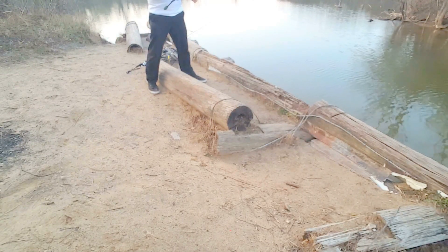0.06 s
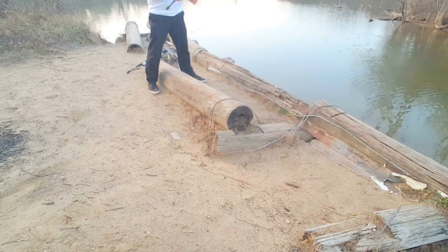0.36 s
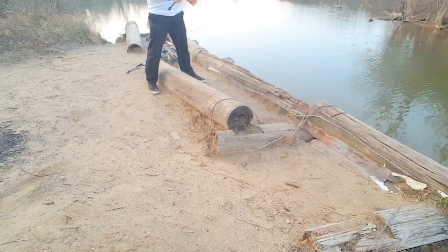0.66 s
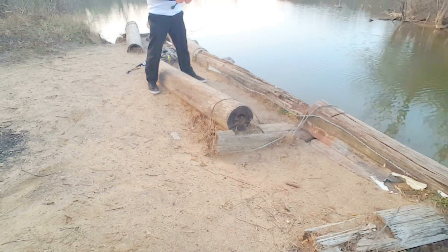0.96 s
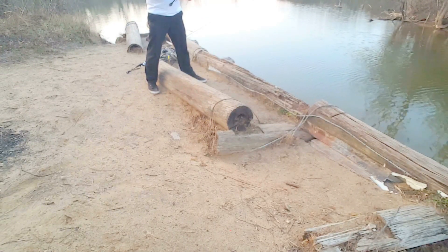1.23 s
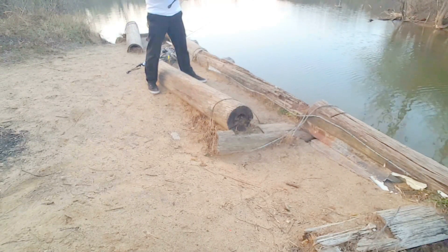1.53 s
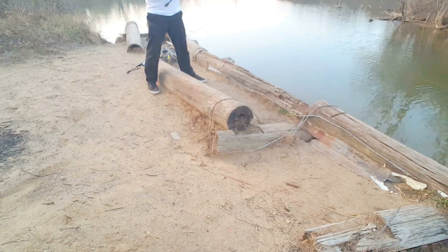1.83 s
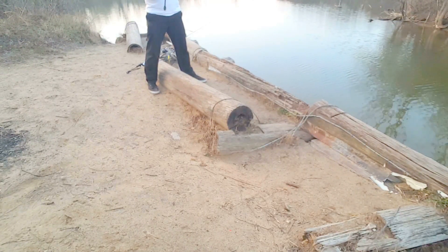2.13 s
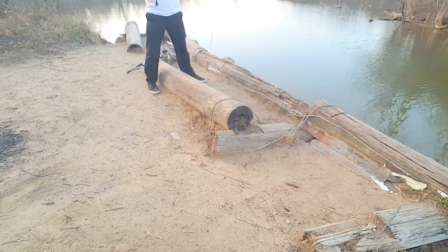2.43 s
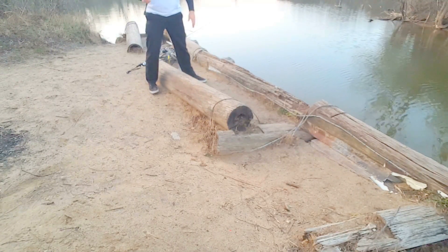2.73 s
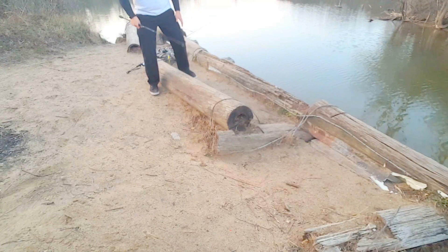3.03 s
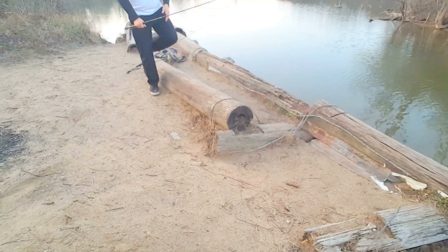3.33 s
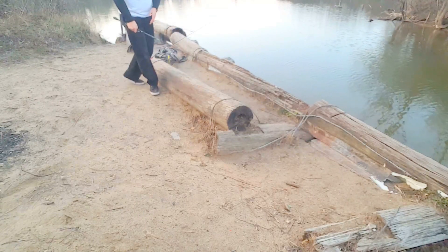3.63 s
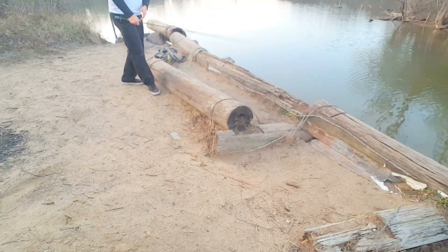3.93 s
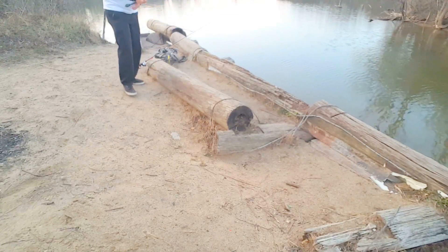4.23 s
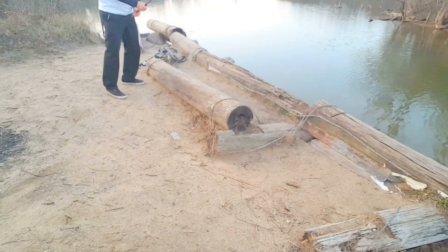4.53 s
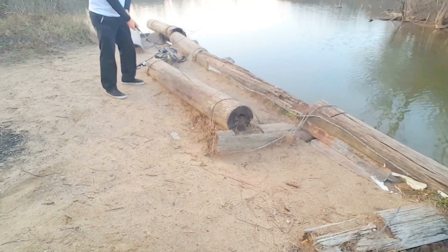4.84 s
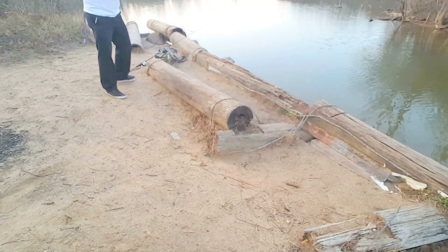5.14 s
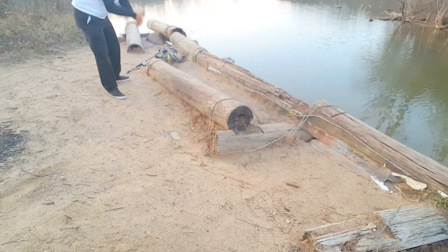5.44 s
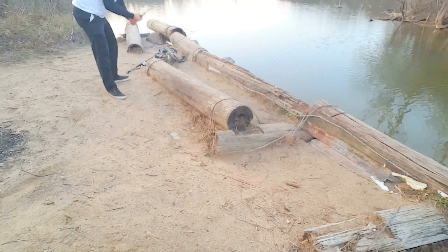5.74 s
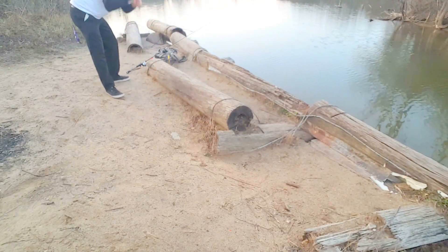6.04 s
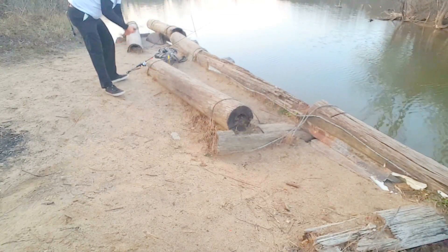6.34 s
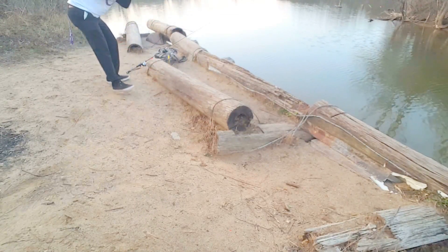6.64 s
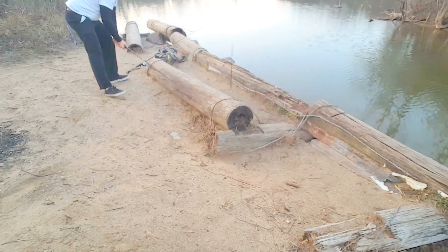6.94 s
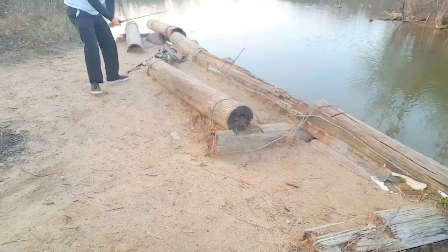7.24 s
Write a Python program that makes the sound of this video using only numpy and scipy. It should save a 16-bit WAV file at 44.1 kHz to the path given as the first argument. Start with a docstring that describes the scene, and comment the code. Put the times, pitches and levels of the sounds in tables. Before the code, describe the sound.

A low, uneven rumble of distant traffic with a soft rush and faint engine hum runs throughout, outdoors beside a pond. At about 1 second a lash gives a quick cluster of light, dry snaps. Small ticks of a thin rod in the hands follow near 1.7, 1.9 and 2.7 seconds. The handle clacks at 3.2, 3.7 and, most strongly, 3.9 seconds, then more softly near 4.9. Shoes scuff faintly on sand between 3 and 5.5 seconds, most clearly at 5. Then come the loudest sounds: three fast swings of the rod at about 5.6, 6.3 and 6.9 seconds, each a short rising swish ending in a sharp whip crack. The first crack is the strongest; the third swish starts lower and sweeps upward. Light lash snaps follow the second swing. Logs and banks return a short, scattered echo, and the rumble continues to about 7.3 seconds.

```python
"""A thin rod with a lash is swung three times on the bank of a pond. Vortex shedding makes each swish
rise in pitch with the rod's speed, and each ends in a crack, the shock wave of the tip.
Before that the lash snaps lightly, the rod ticks and clacks in the hands, and shoes scuff over sand.
Logs and banks scatter a short echo; far traffic rumbles underneath."""
import sys
import numpy as np
from scipy import signal
from scipy.fft import rfft, irfft
from scipy.io import wavfile
from scipy.ndimage import uniform_filter1d

SR = 44100
rng = np.random.default_rng(int(sys.argv[2]) if len(sys.argv) > 2 else 0)


def dump_mix(stems):
    """Bounce the given channels to the path in sys.argv[1] as a 16-bit WAV at rate SR."""
    frames = np.atleast_2d(stems).T  # one column per channel
    limited = np.clip(frames, -1, 1)  # hard clip at full scale
    pcm = np.round(limited * 32767).astype(np.int16)
    wavfile.write(sys.argv[1], SR, pcm)


N = 321489
TIME = np.arange(N) / SR
CUTOFF_HZ = 16000


def from_db(db):
    """Amplitude ratio of a level in decibels."""
    return 10 ** (np.asarray(db) / 20)


def unit_rms(x):
    """Normalisation to unit mean power."""
    return x / np.sqrt(np.mean(x ** 2) + 1e-20)


def at_hz(points, hz):
    """Interpolation of a table on a log-frequency axis."""
    known_hz, values = np.transpose(points)
    return np.interp(np.log(hz + 1), np.log(known_hz), values)


def colour(x, spectrum, size=4096):
    """Minimum-phase filtering to a spectral shape; white noise keeps its power."""
    gain = from_db(at_hz(spectrum, np.fft.rfftfreq(size, 1 / SR)))
    cepstrum = irfft(np.log(unit_rms(gain)))
    cepstrum[1:size // 2] *= 2
    cepstrum[size // 2 + 1:] = 0
    impulse_response = irfft(np.exp(rfft(cepstrum)))
    return signal.oaconvolve(x, impulse_response[None], axes=-1)[:, :N]


def drift(rate_hz, step=16):
    """Low-pass noise: a smooth random wander of unit rms."""
    r = np.exp(-2 * np.pi * rate_hz * step / SR)
    slow = signal.lfilter([1], [1, -2 * r, r * r], rng.standard_normal(2 * N // step))[N // step:]
    return np.interp(np.arange(N) / step, np.arange(len(slow)), unit_rms(slow))


def stereo_noise(correlation):
    """Partly coherent white noise in two channels; the correlation may vary with frequency."""
    mid, side = rfft(rng.standard_normal((2, N)))
    mid, side = mid * np.sqrt((1 + correlation) / 2), side * np.sqrt((1 - correlation) / 2)
    return irfft(np.array([mid + side, mid - side]), N)


def evened(x, size=4000):
    """Division by the running rms takes the chance swells out of noise."""
    return x / np.sqrt(uniform_filter1d(np.mean(x ** 2, axis=0), size) + 1e-12)


def burst(time, rise, decay):
    """Exponential growth to 1 at the given time, then exponential decay."""
    return np.exp(-np.minimum(np.maximum((time - TIME) / rise, (TIME - time) / decay), 20))


def resonate(x, hz, width_hz):
    """A damped resonator with unit gain at its peak."""
    r, w = np.exp(-np.pi * width_hz / SR), 2 * np.pi * hz / SR
    return (1 - r * r) / 2 * signal.lfilter([1, 0, -1], [1, -2 * r * np.cos(w), r * r], x)


def pan(db):
    """Gains for a level difference, left minus right."""
    return from_db([[db / 2], [-db / 2]])


def path_delay(x, samples=2):
    """Path difference: sound from the rod reaches the right microphone port before the left."""
    return np.array([np.roll(x[0], samples), x[1]])


# Spectra of the traffic's rumble and rush: (frequency [Hz], relative level [dB])
RUMBLE_SPECTRUM = [(20, -32), (35, -17.5), (55, -5), (85, -1.5), (112, 1), (140, -6), (185, -7), (240, -18),
                   (400, -31), (1000, -66.5)]
RUSH_SPECTRUM = [(150, -24), (250, -2), (303, -7.5), (557, -3.5), (640, -4), (802, -3.5), (1470, -8.5),
                 (1760, -9), (2050, -14.5), (4490, -36.5), (10900, -42.5), (15200, -40), (16000, -44)]
# Slow course of the rumble: (time [s], relative level [dB])
RUMBLE_LEVELS = [(0.0, -49), (0.18, -43), (0.51, -44.5), (0.81, -54), (0.85, -45.5), (1.48, -43),
                 (2.25, -51.5), (2.33, -44.5), (3.29, -45), (3.51, -49.5), (3.76, -44), (4.73, -46.5),
                 (4.89, -53.5), (5.56, -43), (5.85, -48.5), (7.29, -46)]
# Likeness of left and right: (frequency [Hz], correlation [0-1])
TRAFFIC_CORRELATION = [(30, 0.5), (120, 0.89), (300, 0.89), (650, 0.25), (1400, 0.09), (3000, .15),
                       (6000, 0.07)]
# Engine notes: (frequency [Hz], starting level [dB], final level [dB])
ENGINES = [(106.9, -62, -53), (188.4, -73, -51.5)]


def far_traffic(rumble_db=0.45, lump_db=1.5, rush_db=-50.5, sway_db=0.38, waver_hz=2.53, throb_db=2):
    """Superposition of distant sources: a lumpy rumble, a soft rush and two wavering engine notes."""
    correlation = at_hz(TRAFFIC_CORRELATION, np.fft.rfftfreq(N, 1 / SR))
    level_db = np.interp(TIME, *np.transpose(RUMBLE_LEVELS)) + rumble_db + lump_db * drift(8)
    rumble = from_db(level_db) * evened(colour(stereo_noise(correlation), RUMBLE_SPECTRUM, size=16384))
    rush = from_db(rush_db + sway_db * drift(2.1)) * colour(stereo_noise(correlation), RUSH_SPECTRUM)
    drones = np.zeros(N)
    for hz, first_db, last_db in ENGINES:
        phase = 2 * np.pi * np.cumsum(hz + waver_hz * drift(8.27)) / SR
        drones += from_db(np.linspace(first_db, last_db, N) + throb_db * drift(4.8)) * np.sin(phase)
    return rumble + rush + drones


# Strength of the scattered sound: (frequency [Hz], relative gain [dB])
ECHO_GAINS = [(200, -18), (800, -19), (1500, -20), (2500, -8.5), (4000, -4), (8000, -10.5), (16000, -6.5)]
# The microphone's ripple for sound arriving from all round: (frequency [Hz], relative gain [dB])
DIFFUSE_RESPONSE = [(1800, 3.5), (2400, 4), (3200, -1), (4300, 0), (5200, -0.5), (7000, 1.5), (8650, 3.5),
                    (9200, -3), (12000, -1)]


def bank_echo(x, arrival_s=0.014, rise_s=0.053, near_t60=0.36, far_db=-20, far_t60=1.0,
              logs_s=0.034, logs_spread_s=0.01, logs_db=5, flutter_db=2.0, bands=14):
    """Diffuse scattering: ground, logs and brush spread the energy in time; the far shore adds a tail."""
    t, out = TIME[:SR], np.zeros((2, N))
    swell = np.exp(np.minimum(t - arrival_s, 0) / rise_s)
    logs = from_db(logs_db * np.exp(-((t - logs_s) / logs_spread_s) ** 2))
    near = logs * np.minimum(swell, from_db(-60 * (t - arrival_s) / near_t60))
    far = from_db(far_db - 60 * t / far_t60) * (t > arrival_s)
    edges, shared_flutter = np.geomspace(200, CUTOFF_HZ, bands + 1), drift(60)
    for low, high in zip(edges, edges[1:]):
        band, hz = signal.butter(3, [low, high], "band", fs=SR, output="sos"), np.sqrt(low * high)
        # air absorbs 28 dB per second at 8 kHz, growing with frequency squared
        absorption = from_db(-28 * t * (hz / 8000) ** 2)
        response = (near ** 2 + far ** 2) * absorption ** 2
        energy = np.mean(signal.sosfilt(band, x + 1e-18) ** 2, axis=0)
        scattered = np.abs(signal.oaconvolve(energy, response / response.sum())[:N])
        # single logs and bushes return more than their neighbours, so the echo flutters
        flutter = (shared_flutter + drift(60)) / np.sqrt(2)
        gain = from_db(at_hz(ECHO_GAINS, hz) + flutter_db * flutter)
        out += gain * np.sqrt(scattered) * unit_rms(signal.sosfilt(band, rng.standard_normal((2, N))))
    return colour(out, DIFFUSE_RESPONSE)


# Shoe scuffs: (time [s], half length [s], level [dB])
SCUFFS = [(3.026, .14, -63.5), (3.783, .04, -68), (4.648, 0.037, -62), (4.74, 0.014, -62),
          (4.983, 0.018, -49.5), (5.173, 0.039, -66), (5.42, 0.16, -68)]
# Spectrum of grinding sand: (frequency [Hz], relative level [dB])
SAND_SPECTRUM = [(800, -10), (2500, 11), (5000, 2.5), (8600, 2.5), (9500, -11.5), (16000, -7.5)]


def shoe_scuffs(grain_db=5):
    """Friction noise: sand grinds in uneven grains under a shifting foot."""
    pressure = sum(from_db(db) * np.exp(-np.minimum(((TIME - time) / half_length) ** 2, 20))
                   for time, half_length, db in SCUFFS)
    grains = unit_rms(from_db(grain_db * drift(120)) * stereo_noise(0.18))
    return colour(pressure * grains, SAND_SPECTRUM)


# Impacts in the handle: (time [s], level [dB], decay [s], pitch [Hz], treble gain [dB],
# rebound delay [s], opening tick level [dB])
CLACKS = [(3.2286, -39, 0.017, 2130, 5, 0.034, -32.5), (3.6822, -37.5, 0.0052, 2120, 2.5, 0.009, -39.5),
          (3.892, -27, 0.0043, 2390, -3, .017, -38), (4.864, -50, .003, 2350, -17, 0.0024, -68),
          (4.92, -45, 0.0064, 2160, -2, 0.049, -52)]
# Modes of the handle: (frequency / pitch [ratio], bandwidth [Hz], relative gain [dB])
HANDLE_MODES = [(.55, 600, -4.5), (1, 240, 6), (1.33, 387, -2.5), (1.8, 600, -4), (2.75, 900, -7),
                (3.4, 810, -42)]
# Thin overtones of the rod: (frequency [Hz], bandwidth [Hz], relative gain [dB])
ROD_MODES = [(4350, 15, -6), (6950, 26, -17), (8360, 40, -7)]
# Spectrum of the contact noise: (frequency [Hz], relative level [dB])
CONTACT_SPECTRUM = [(300, -14), (600, 9), (1300, -7), (3000, -13), (8400, 8), (9600, -17), (15500, -37)]


def handle_clacks(seat_s=0.0022, rise_s=0.0011, ring_db=13, contact_db=-6, rod_db=19,
                  rebound_db=-5, rebound_treble_db=2, damping_hz=8500):
    """Modal ringing: a rattling impact and its shorter rebound excite the handle and, faintly, the rod."""
    rings, contacts, grit = np.zeros((2, N)), np.zeros((2, N)), stereo_noise(0.18)
    for time, db, decay, pitch_hz, treble_db, rebound_s, _ in CLACKS:
        seated = time + seat_s   # the handle seats just after the first touch
        strike = from_db(db) * burst(seated, rise_s, decay) * grit
        rebound = from_db(db + rebound_db) * burst(seated + rebound_s, rise_s, decay / 2) * grit
        contacts += from_db(contact_db + treble_db) * (strike + from_db(rebound_treble_db) * rebound)
        for k, (ratio, width_hz, mode_db) in enumerate(HANDLE_MODES):
            mode = resonate(strike + rebound, pitch_hz * ratio, width_hz)
            rings += (-1) ** k * from_db(ring_db + mode_db) * mode
    rings = signal.sosfilt(signal.butter(8, damping_hz, fs=SR, output="sos"), rings)
    singing = sum(from_db(rod_db + db) * resonate(contacts, hz, width) for hz, width, db in ROD_MODES)
    return path_delay(rings + singing + colour(contacts, CONTACT_SPECTRUM), samples=4)


# Ticks of the rod in the hands: (time [s], level [dB])
TICKS = [(.899, -53), (1.729, -46.5), (1.949, -46.5), (2.680, -40.5), (2.705, -47.5), (2.761, -48.5),
         (4.980, -43.5)]
# Spectrum shared by ticks and lash snaps: (frequency [Hz], relative level [dB])
CLICK_SPECTRUM = [(300, 6), (1500, 6.5), (3000, 4.5), (4300, -4), (8300, 4), (10000, -1), (15500, 3)]


def grip_ticks(rise_s=0.00053, decay_s=0.0037, pan_db=-2):
    """Brief contacts radiate broadband ticks as the grip shifts and at the first touch of each clack."""
    touches = TICKS + [(time, tick_db) for time, *_, tick_db in CLACKS]
    force = sum(from_db(db) * burst(time, rise_s, decay_s) for time, db in touches)
    return path_delay(colour(pan(pan_db) * force * stereo_noise(0.32), CLICK_SPECTRUM))


# Light snaps of the lash: (time [s], level [dB])
SNAPS = [(1.006, -47), (1.0132, -22.5), (1.0164, -29), (1.063, -34.5), (1.18, -48), (6.371, -29.5),
         (6.576, -42), (6.891, -47)]


def lash_snaps(rise_s=0.00027, decay_at_0_db_s=0.0001, doubling_db=7, pan_db=1):
    """Impulsive radiation: the slacker the lash snaps, the softer and longer its pulse of noise."""
    force = sum(from_db(db) * burst(time, rise_s, decay_at_0_db_s * 2 ** (-db / doubling_db))
                for time, db in SNAPS)
    return colour(pan(pan_db) * force * stereo_noise(0.34), CLICK_SPECTRUM)


# Cracks of the tip: (time [s], relative shock level [dB], spray level [dB], spray rise [s],
# spray decay [s], left minus right [dB])
CRACKS = [(5.6327, -3, -11.5, .00042, 0.0054, 0), (5.6348, -11.5, -26, .0009, 0.0026, 4),
          (6.2922, -16, -21.5, 0.00065, 0.0018, -11), (6.296, -9.5, -15, .0013, 0.0022, -14),
          (6.949, -8, -11.5, 0.0018, 0.0019, 5), (6.9586, -24.5, -19, .0007, 0.0019, -10)]
# Spectrum of a crack: (frequency [Hz], relative level [dB])
CRACK_SPECTRUM = [(150, -17), (600, -10), (1300, -2.5), (2200, 1.5), (4200, -3), (5200, -5), (8500, -3),
                  (9400, -10.5), (15000, -15)]


def tip_cracks(shock_gain_db=3, grain_db=4, shock_samples=6):
    """Shock radiation: the tip throws an N-wave, wrapped in a spiky spray of its reflections scattered close
    by."""
    out = np.zeros((2, N))
    spray = unit_rms(stereo_noise(0.11) * from_db(grain_db * np.clip(rng.standard_normal(N), -2, 2)))
    n_wave = np.linspace(0.5, -0.5, shock_samples)
    for time, shock_db, spray_db, rise, decay, pan_db in CRACKS:
        shock, start = np.zeros(N), round(time * SR)
        shock[start:start + shock_samples] = from_db(shock_db + shock_gain_db) * n_wave
        out += pan(pan_db) * (shock + from_db(spray_db) * burst(time, rise, decay) * spray)
    return path_delay(colour(out, CRACK_SPECTRUM))


# Swings of the rod: (time of top speed [s], rise [s], fall [s], centre pitch [Hz],
# spread to either side [octaves], level [dB], climb as the lash unrolls [octaves])
SWINGS = [(5.619, .028, .018, 1354, 0.95, -19, .03), (6.28, .019, .016, 1446, .92, -18, 0.033),
          (6.931, .021, 0.018, 942, 0.419, -20, 1.5)]
# Spectra of the hissing wake and of the air dragged along: (frequency [Hz], relative level [dB])
WAKE_SPECTRUM = [(200, -5), (700, -4), (2000, 4.5), (4000, -0.5), (8300, -7), (9500, -11.5), (16000, -16.5)]
DRAUGHT_SPECTRUM = [(60, -21.5), (200, -6), (290, -7.5), (380, 1), (600, -4), (1200, -31.5), (4000, -46.5)]


def rod_swishes(speed_exponent=4.43, wander=0.0423, wander_hz=50, edge_db=-8, wake_db=-16,
                draught_db=-14.5, draught_lag_s=0.013, stretches=16):
    """Aeolian tones: the rod sheds vortices at a rate set by its speed; a wake and a draught trail it."""
    whistle, envelope = np.zeros(N), np.zeros(N)
    eddies = [drift(wander_hz) for _ in range(stretches)]
    for time, rise, fall, hz, spread, db, climb in SWINGS:
        active = np.abs(TIME - time) < 0.2
        t = TIME[active] - time
        speed = 1 / np.hypot(1, t / np.where(t < 0, rise, fall))
        amplitude = speed ** speed_exponent
        unrolled = np.tanh(np.maximum(t, 0) / fall)
        tones = np.zeros(len(t))
        # stretches near the tip move faster and sing higher than those near the hand
        for place, eddy in zip(np.linspace(-1, 1, stretches), eddies):
            pitch = hz * 2 ** (spread * place + climb * unrolled) * speed * (1 + wander * eddy[active])
            phase = 2 * np.pi * (np.cumsum(pitch) / SR + rng.random())
            tones += from_db(edge_db * place ** 2) * np.sin(phase)
        whistle[active] += from_db(db) * unit_rms(tones * amplitude) * np.sqrt(np.mean(amplitude ** 2))
        envelope[active] += from_db(db) * amplitude
    # the air dragged along takes a moment to settle
    settle = np.exp(-1 / (draught_lag_s * SR))
    lagging = signal.lfilter([1 - settle], [1, -settle], envelope)
    draught = lagging * evened(colour(stereo_noise(0.96), DRAUGHT_SPECTRUM), size=500)
    wake = colour(envelope * stereo_noise(0.55), WAKE_SPECTRUM)
    return path_delay(whistle * pan(1.2) + from_db(wake_db) * wake + from_db(draught_db) * draught)


def scene(echo_db=-1, snap_send_db=4, clack_send_db=-1, tick_send_db=-3):
    """Superposition of the rod's direct sound, its echo, the shoes and the traffic."""
    snaps = lash_snaps()
    swings = rod_swishes() + tip_cracks()
    clacks, ticks = handle_clacks(), grip_ticks()
    toward_banks = (swings + from_db(snap_send_db) * snaps + from_db(clack_send_db) * clacks
                    + from_db(tick_send_db) * ticks)
    echo = from_db(echo_db) * bank_echo(toward_banks)
    return swings + path_delay(snaps) + clacks + ticks + echo + shoe_scuffs() + far_traffic()


def record(dry, ceiling=0.76):
    """Soft saturation rounds the highest peaks; a steep low-pass filter limits the bandwidth."""
    rounded = ceiling * np.tanh(dry / ceiling)
    return signal.sosfilt(signal.ellip(10, 0.2, 80, CUTOFF_HZ, fs=SR, output="sos"), rounded)


dry = scene()
out = record(dry)
dump_mix(out)
```